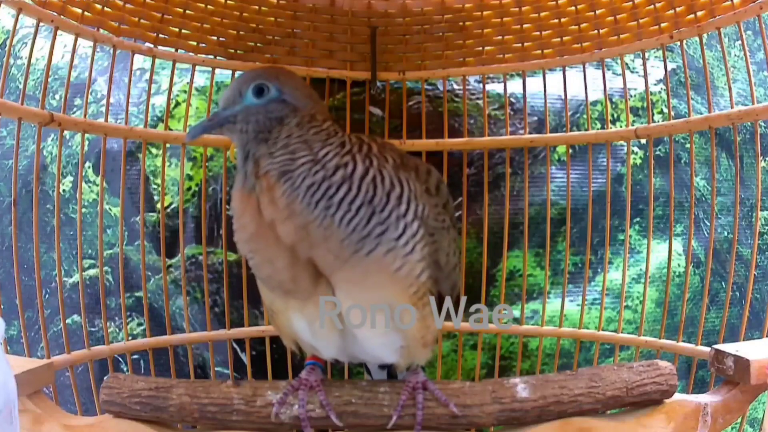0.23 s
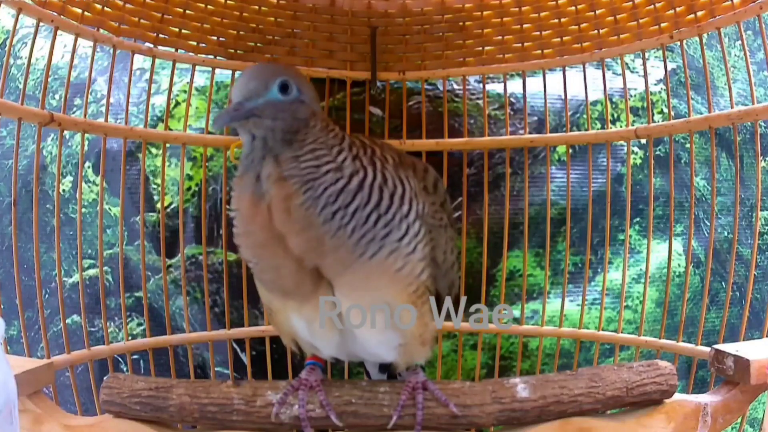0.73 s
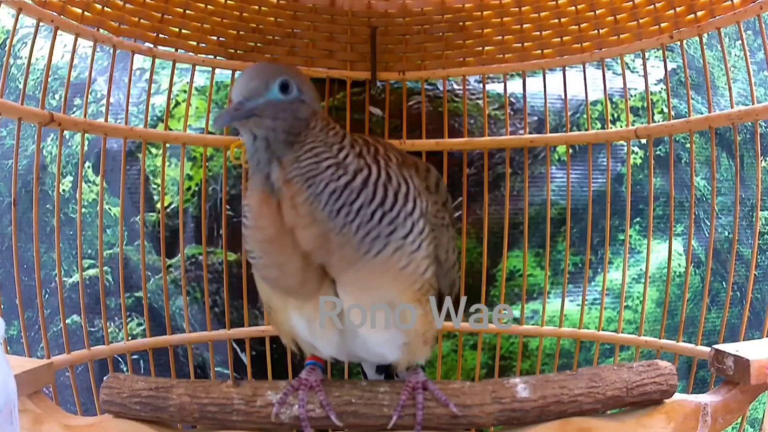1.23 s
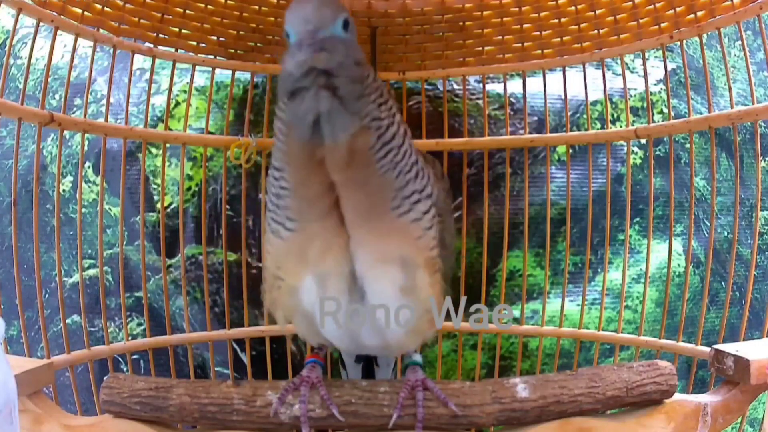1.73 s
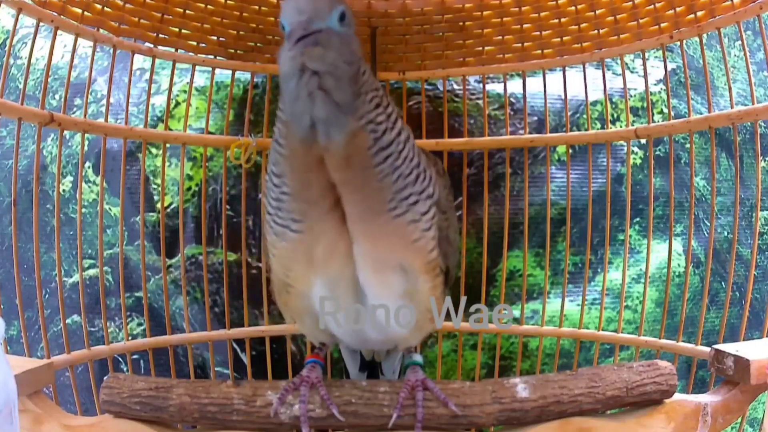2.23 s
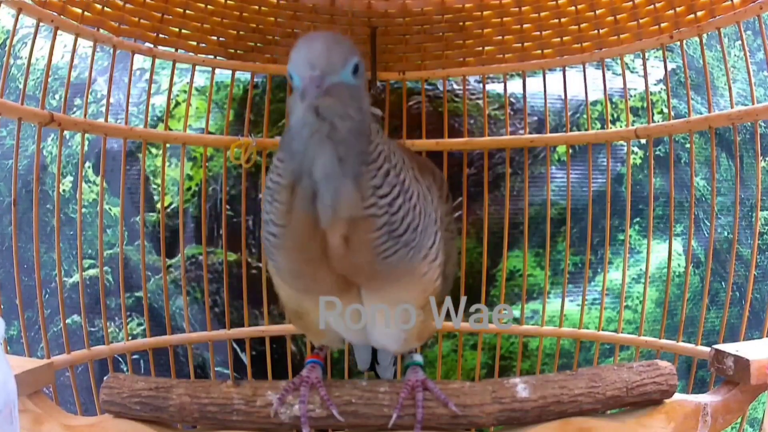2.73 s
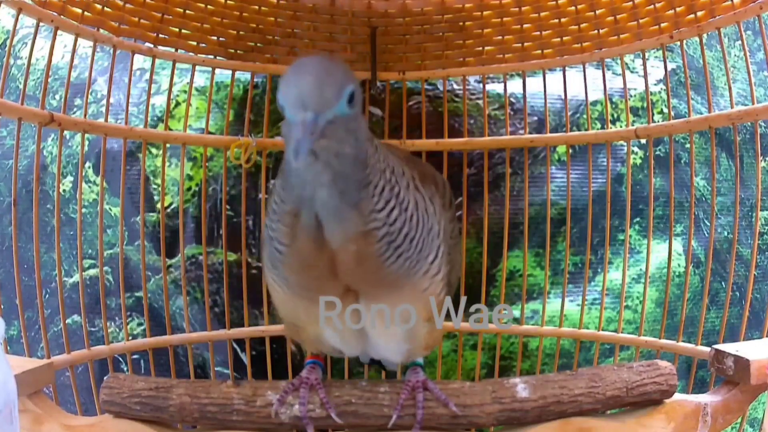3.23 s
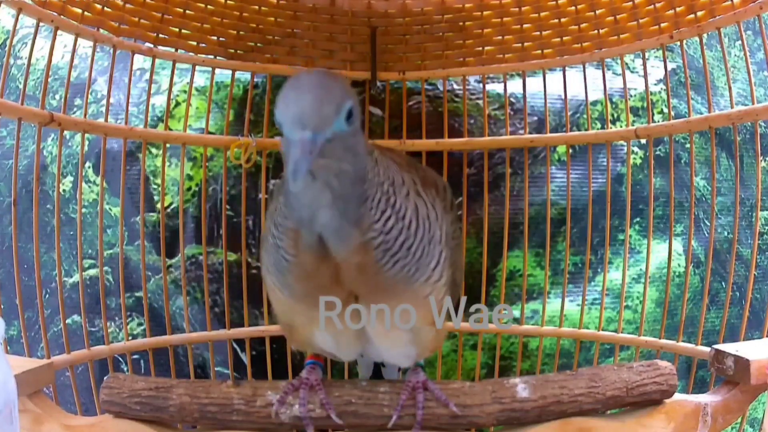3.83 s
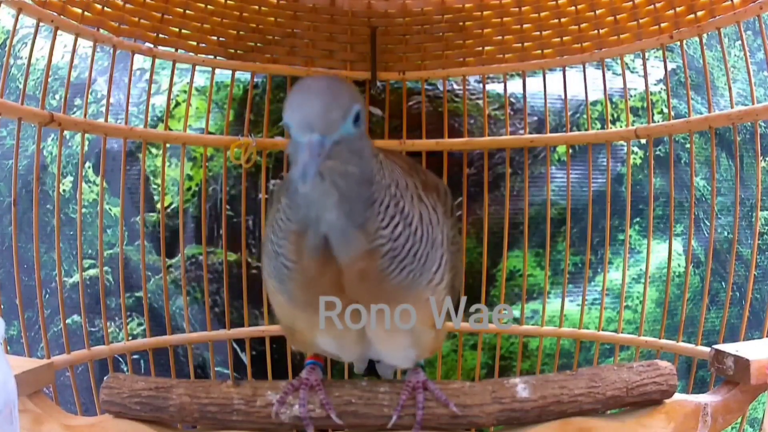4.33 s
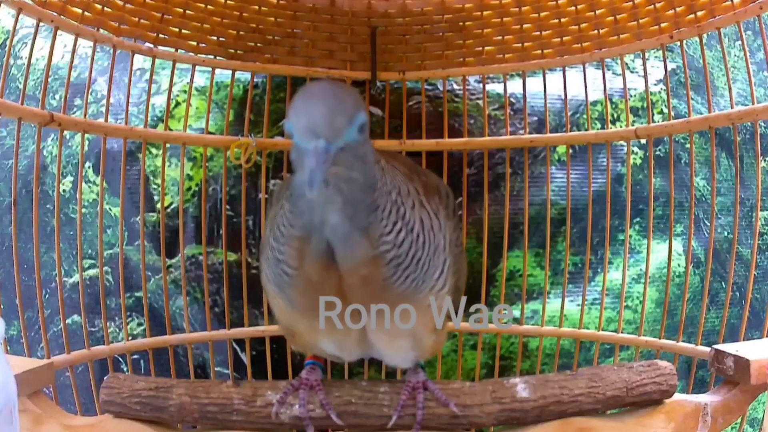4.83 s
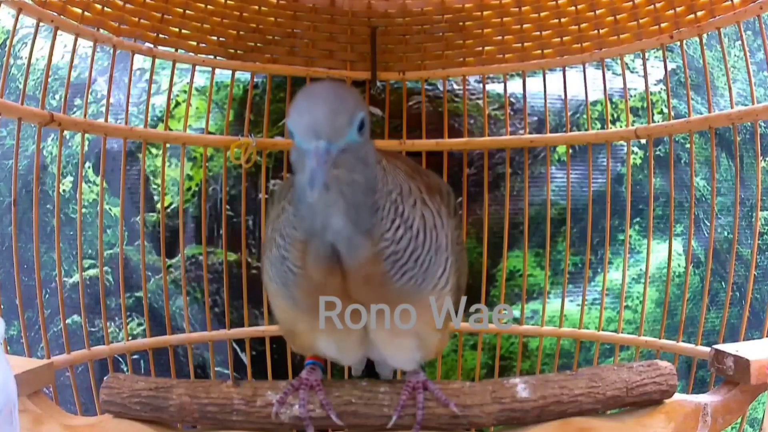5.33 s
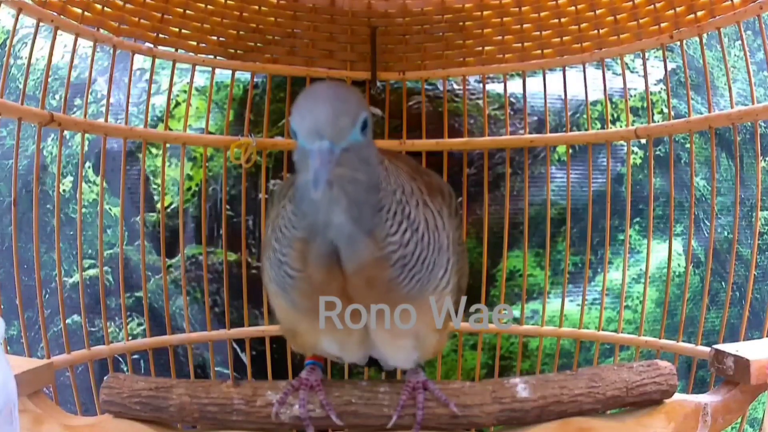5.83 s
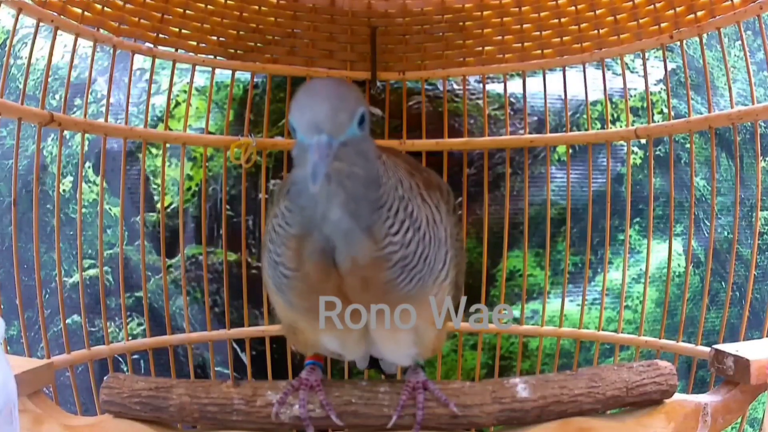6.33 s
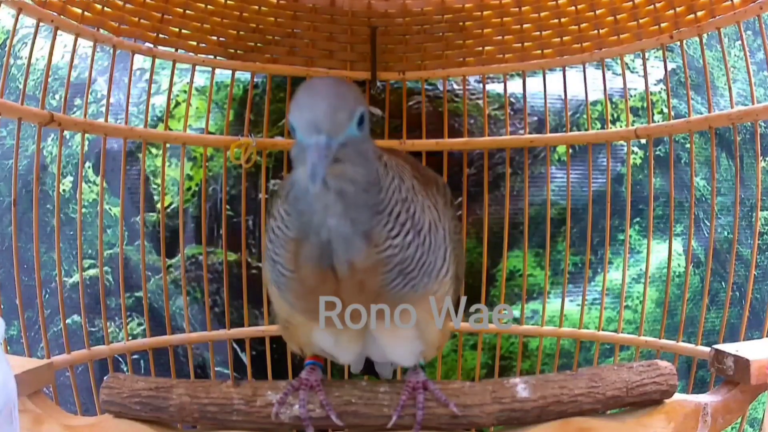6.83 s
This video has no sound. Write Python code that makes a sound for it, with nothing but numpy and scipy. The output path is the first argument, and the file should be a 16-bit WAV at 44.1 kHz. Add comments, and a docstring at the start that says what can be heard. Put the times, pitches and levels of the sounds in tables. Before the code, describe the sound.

A quiet porch: soft low rumble, faint hum, thin throbbing insects and grainy rustle, wider on the right. At 0.7 s a dove off to the right gives a short note gliding upward and breaking off, its tone nearly pure and flute-like, with echoes ringing from hard walls. From 1.2 s it repeats short, round coos about four a second, each scooping up, gradually longer and more widely spaced until 4.6 s. A rustle swells around 1.6 s as the rumble briefly dips. At 2.6 s a closer, centred, drier dove enters with a jumping opening note, then from 3.0 to 6.0 s its own lower, softer coos, interleaved with the first bird. The right-hand dove closes with a long, slightly sinking coo from 4.9 to 5.7 s; the near one closes likewise from 6.2 to 6.8 s. A rustle peaks near 6.5 s, then quiet air until about 7 s.

```python
"""First come a low rumble, a hum, a band of insects and swells of rustle around a quiet porch.
Then a caged dove further off to the right sings and rings in the walls; a close, centred one answers lower.
Each gives a gliding opening note, a run of short coos and a long closing coo. The doves are gliding
sine tones with weak overtones and breath; the walls are fading echoes; the hum is a wavering sine.
Rumble, air, insects and rustle are noise shaped to different pitch ranges."""
import sys
import numpy as np
from scipy import signal
from scipy.fft import rfft, irfft, next_fast_len
from scipy.io import wavfile
from scipy.ndimage import uniform_filter1d

SR = 44100
rng = np.random.default_rng(int(sys.argv[2]) if len(sys.argv) > 2 else 0)


def dump_mix(stems):
    """Bounce the given channels to the path in sys.argv[1] as a 16-bit WAV at rate SR."""
    frames = np.atleast_2d(stems).T  # one column per channel
    limited = np.clip(frames, -1, 1)  # hard clip at full scale
    pcm = np.round(limited * 32767).astype(np.int16)
    wavfile.write(sys.argv[1], SR, pcm)


N = 312669  # length in samples

# Opening note and long closing coo, each a list of points: time_s, pitch_hz, level_db
FAR_LONG_NOTES = [
    [(.735, 457.6, -56), (.77, 697, -30.5), (.782, 844, -17), (.83, 912.6, -16.5), (.872, 933.6, -16.5),
     (.888, 1051, -19.5), (.908, 1095, -18), (.919, 830, -22), (.93, 760, -38)],
    [(4.885, 557, -52.5), (4.897, 787.5, -29), (4.906, 844, -14.5), (4.99, 887.7, -18.5),
     (5.36, 882.7, -17.5), (5.5, 857.4, -18), (5.655, 840, -24), (5.675, 798, -33.5), (5.685, 755, -54)],
]
NEAR_LONG_NOTES = [
    [(2.622, 477, -44.5), (2.634, 652, -33), (2.655, 711, -18), (2.705, 796.8, -15), (2.711, 1054, -14),
     (2.795, 1064, -11.5), (2.816, 1045, -12.5), (2.826, 992.3, -16), (2.853, 1021, -12.5),
     (2.864, 760, -21.5), (2.874, 514, -46.5)],
    [(6.238, 660, -49), (6.248, 632, -28), (6.27, 716.5, -16.5), (6.304, 735, -19), (6.53, 720.5, -18.5),
     (6.68, 706.2, -23), (6.818, 703.5, -22), (6.832, 654, -27), (6.845, 643, -47)],
]
# Short coos: start_s, end_s, final_pitch_hz (before the closing drop), level_db (at the start)
FAR_SHORT_COOS = [(1.224, 1.29, 904, -12), (1.476, 1.554, 906.3, -12.5), (1.735, 1.823, 926, -11.5),
                  (2.011, 2.108, 922.6, -13), (2.282, 2.386, 916.2, -12), (2.574, 2.699, 921.6, -12.5),
                  (2.888, 3.01, 909.5, -13), (3.207, 3.367, 918.2, -14), (3.603, 3.784, 906, -13.5),
                  (4.018, 4.201, 908.6, -14), (4.418, 4.644, 902.5, -14.5)]
NEAR_SHORT_COOS = [(3.045, 3.133, 800, -17.5), (3.271, 3.367, 800, -16.5), (3.503, 3.615, 782, -17),
                   (3.754, 3.872, 775, -16.5), (4.013, 4.143, 772, -17), (4.292, 4.434, 774, -17),
                   (4.581, 4.73, 764, -17), (4.877, 5.036, 762, -17.5), (5.182, 5.345, 755, -17.5),
                   (5.505, 5.677, 745, -18.5), (5.85, 6.032, 748, -19)]
# Where every short coo aims first and how it swells or fades to its end: first_pitch_hz, swell_db
FAR_FIRST_AIM = (892, -3)
NEAR_FIRST_AIM = (746, 3)
# How a short coo starts and stops: quick_scoop_share, quick_scoop_s, slow_scoop_share, slow_scoop_s,
# pitch_drop_share, pitch_drop_s, attack_s, release_s
FAR_COO_SHAPE = (.38, .0055, .085, 0.03, 0.1, 0.005, 0.0074, 0.0097)
NEAR_COO_SHAPE = (.17, .006, .165, 0.022, .27, 0.0096, 0.0074, 0.0058)
# How the closed throat passes overtones, loud near the windpipe resonance:
# pitch_hz, level_db (against the fundamental)
FAR_THROAT_CURVE = [(900, -12.5), (1330, -3.5), (1550, -31.5), (1800, -36.5), (2150, -19.5), (2500, -32.5),
                    (2750, -31), (3150, -17), (3450, -40), (3750, -18.5), (4050, -37.5), (4450, -34.5),
                    (5400, -46), (7000, -64)]
NEAR_THROAT_CURVE = [(1000, -19), (1320, -15), (1410, -35.5), (1465, -23.5), (1560, -22), (2000, -34),
                     (2250, -33.5), (2900, -45.5), (3200, -41), (3700, -57.5), (4250, -47.5), (5300, -50),
                     (6300, -48), (8000, -71)]
# Third to seventh overtone: levels_db (list, against the throat curve),
# gain_db_per_db (of effort), normal_effort_db
FAR_UPPER_OVERTONES = ([-5, -18.5, -8, -17, -18], 1.1, -12)
NEAR_UPPER_OVERTONES = ([-6, -9.5, -8.5, -10, -10.5], 0.84, -14)
# How unevenly the overtones come and go: second_db, higher_db
FAR_PATCHINESS = (4, 6)
NEAR_PATCHINESS = (1.2, 1.5)
# Hoarse puffs where a long note catches or breaks off: start_s, length_s, level_db
FAR_HOARSE_PUFFS = [(0.735, 0.047, -29.5), (0.912, 0.019, -35), (4.883, 0.018, -26)]
NEAR_HOARSE_PUFFS = [(2.62, 0.028, -33), (2.699, 0.014, -30), (2.854, 0.02, -31)]
# The far bird also catches before every short coo: lead_s, length_s, level_db
FAR_COO_CATCH = (0.0074, .016, -31)
# Tone colour of the hoarse puffs and of the breath: pitch_hz, relative_level_db (per Hz)
PUFF_COLOUR = [(300, -32), (550, -3.5), (900, -2.5), (1150, -6.5), (1340, 1), (1500, -18.5), (2000, -34.5),
               (4000, -53.5)]
BREATH_COLOUR = [(150, -13.5), (500, -1), (1000, 0), (1500, -8), (2200, -19.5), (3500, -31), (9000, -45)]
# Dense wall echoes: low_db, high_db, first_echo_s, low_fade_s, high_fade_s (time to fade by 60 dB)
FAR_WALL_ECHOES = (-5.5, 0, 0.12, 1.09, 0.66)
NEAR_WALL_ECHOES = (-15.5, -22, .012, .45, .3)
# Late answers from hard walls behind the far cage: delay_s, level_db
HARD_WALL_ECHOES = [(.0462, -12), (.0613, -13.5), (.0834, -14), (.112, -16.5)]
# Tone colour of the steady rumble and of the outdoor air: pitch_hz, relative_level_db (per Hz)
RUMBLE_COLOUR = [(15, -33.5), (30, -16), (55, -9), (70, -0.5), (90, -4.5), (150, -6), (230, -17.5),
                 (450, -14.5), (1000, -25.5), (2000, -36.5), (5000, -44.5), (11000, -43), (12500, -38.5),
                 (15500, -39.5)]
AIR_COLOUR = [(20, -15.5), (70, -2), (150, -10), (400, -19.5), (900, -16.5), (1500, -27), (3000, -32),
              (6500, -38.5), (10500, -40.5), (12000, -52.5)]
# Level changes of the centred noise, with a brief dip: time_s, bass_db, top_hiss_db
CENTRE_LEVELS = [(0, 0, 1), (1.55, 0, 0), (1.6, -6, -14), (1.7, -7, -12), (1.8, 1, -6), (2.2, 0, -4),
                 (2.3, 0, 0), (7.1, -2, -1)]
# The hum: time_s, pitch_hz, level_db
HUM_PATH = [(0, 176.2, -67), (.3, 172.6, -58), (1.0, 171.8, -58), (1.5, 171, -59.5), (1.65, 172, -87),
            (6.55, 205.5, -83), (6.7, 205.6, -57.5), (7.1, 201.4, -59)]
# The insect band: pitch_hz, width_hz, level_db
INSECT_BAND = (7300, 670, -71)
# Swells of the rustle: time_s, level_db
RUSTLE_SWELLS = [(0.0, -81), (0.43, -65), (0.63, -68), (0.75, -61), (1.22, -76.5), (1.6, -57), (1.78, -66),
                 (2.27, -77.5), (2.33, -63), (2.43, -73.5), (2.76, -65), (2.88, -77), (3.37, -69),
                 (4.84, -70.5), (5.03, -65.5), (5.37, -60), (5.5, -64.5), (5.79, -62), (5.86, -70),
                 (6.3, -69.5), (6.48, -55), (6.62, -65.5), (6.9, -78.5), (7.09, -72)]
# Bands of rustle that flicker apart: pitch_hz, width_hz, level_db (added to the swells)
RUSTLE_PARTS = [(3780, 310, -4), (4600, 540, -3), (5680, 1200, -5.5), (7000, 2100, -4.5), (8400, 670, -8.5),
                (10200, 2200, -2.5)]

FAR_BREATH_DB, NEAR_BREATH_DB = -31.5, -26
FAR_LEFT_DB, RIGHT_TO_LEFT_S = -8.5, 0.0003
ECHO_LEFT_DB, HARD_ECHO_LEFT_DB = -5.5, -8
SWAY_S = .00012  # how far the path to the walls wanders as bird and air move
RUMBLE_DB, AIR_DB = -52, -48.5
YARD_LEFT_DB, YARD_LIKENESS = -6.5, 0.3  # likeness: share of sound common to both sides
OFFSET = -.0047
TOP_HZ = 15600


def phrase(notes, coos, aim, shape):
    """Pitch and size of a whole song; a short coo scoops up, moves slowly and drops as it shuts."""
    hz, size, t = np.full(N, 600.), np.zeros(N), np.arange(N) / SR
    for note in notes:
        on = slice(int(note[0][0] * SR), int(note[-1][0] * SR))
        pitch, db = curve(note)
        hz[on], size[on] = pitch[on], undb(db[on])
    first_hz, swell_db = aim
    quick, quick_s, slow, slow_s, drop, drop_s, attack_s, release_s = shape
    for start, end, final_hz, db in coos:
        on = slice(int(start * SR), int(end * SR))
        since = t[on] - start
        left = np.maximum(end - t[on], 0)
        part = since / (end - start)  # 0 at the start, 1 at the end
        scoop = quick * np.exp(-since / quick_s) + slow * np.exp(-since / slow_s)
        bend = 1 - scoop - drop * np.exp(-left / drop_s)
        hz[on] = (first_hz + part * (final_hz - first_hz)) * bend
        attack = (1 - np.exp(-np.abs(since) / attack_s)) ** 3
        release = (1 - np.exp(-left / release_s)) ** 2
        size[on] = undb(db + part * swell_db) * attack * release
    # a short running average rounds the corners
    return uniform_filter1d(hz, size=90), uniform_filter1d(size, size=90)


def dove(hz, size, throat, upper, patchiness, puffs, breath_db):
    """A near-pure tone with weak, patchy overtones that grow with effort, a little air and hoarse puffs."""
    hz = hz * (1 + .0025 * walk(60))  # slight waver in pitch
    phase = 2 * np.pi * np.cumsum(hz) / SR
    levels_db, gain, normal_db = upper
    second_db, higher_db = patchiness
    effort_db = gain * (20 * np.log10(size + 1e-6) - normal_db)
    second = undb(colour(throat, 2 * hz) + second_db * walk(50))
    tone = np.sin(phase) + second * np.sin(2 * phase + 1)
    for k, level_db in enumerate(levels_db, start=3):
        overtone_db = colour(throat, k * hz) + level_db + effort_db + higher_db * walk(80)
        tone = tone + undb(overtone_db) * np.sin(k * phase + k)
    shimmer = undb(1.14 * walk(45))  # slight flicker in level
    breath = undb(breath_db) * noise(BREATH_COLOUR)
    voice = np.sqrt(2) * shimmer * tone + breath
    return size * voice + hoarse_puffs(puffs)


def hoarse_puffs(puffs):
    """Short bumps of rough noise in the voice."""
    loudness = np.zeros(N)
    for start, length, db in puffs:
        bump = undb(db) * np.hanning(int(length * SR)) ** .5
        first = int(start * SR)
        loudness[first:first + len(bump)] = bump
    return loudness * noise(PUFF_COLOUR)


def walls(x, room, count):
    """Dense echoes that die away, the treble sooner; one unrelated pattern per channel."""
    low_db, high_db, first_s, low_s, high_s = room
    t = np.arange(SR) / SR
    dense = rng.standard_normal((count, SR))
    low = signal.sosfiltfilt(signal.butter(3, 1200, fs=SR, output="sos"), dense)
    low_fade, high_fade = undb(-60 * t / low_s), undb(-60 * t / high_s)
    low_fade = low_fade / np.sqrt(np.sum(low_fade ** 2))
    high_fade = high_fade / np.sqrt(np.sum(high_fade ** 2))
    tail = undb(low_db) * low * low_fade + undb(high_db) * (dense - low) * high_fade
    tail = tail * np.clip(t / first_s - 1, 0, 1)  # silent until the first echo, then builds up
    swayed = np.interp(np.arange(N) + SWAY_S * SR * walk(25), np.arange(N), x)
    return signal.fftconvolve(swayed[None], tail, axes=1)[:, :N]


def hard_walls(x):
    """A few separate late echoes, each a delayed and softer copy, softest on the left."""
    slaps = sum(undb(db) * np.roll(x, int(delay_s * SR)) for delay_s, db in HARD_WALL_ECHOES)
    return slaps * undb([[HARD_ECHO_LEFT_DB], [0]])


def from_right(x, left_db):
    """A sound from the right reaches the left side later and softer."""
    late = np.interp(np.arange(N) - RIGHT_TO_LEFT_S * SR, np.arange(N), x)
    return np.array([undb(left_db) * late, x])


def centred_background():
    """Noise split into a swelling rumble and a thin top hiss, plus a sine hum that wavers."""
    bass_db, top_db = curve(CENTRE_LEVELS)
    rumble = noise(RUMBLE_COLOUR) * undb(RUMBLE_DB)
    top = signal.sosfiltfilt(signal.butter(6, 11500, "high", fs=SR, output="sos"), rumble)
    swell_db = 1.5 * walk(6)
    hz, db = curve(HUM_PATH)
    hum_phase = 2 * np.pi * np.cumsum(hz * (1 + 0.012 * walk(13))) / SR
    hum = undb(db + 4.3 * walk(4.4)) * np.sin(hum_phase)
    return (rumble - top) * undb(bass_db + swell_db) + top * undb(top_db) + np.sqrt(2) * hum


def yard():
    """Noise bands for wide air, throbbing insects and grainy rustle, all louder on the right."""
    hz, width, db = INSECT_BAND
    layers = [(undb(AIR_DB), AIR_COLOUR), (undb(db + 2.1 * walk(14)), band(hz, width))]
    swell_db = curve(RUSTLE_SWELLS)[0] + 2.5 * walk(30)  # shared by all rustle bands
    for hz, width, db in RUSTLE_PARTS:
        layers.append((undb(swell_db + db + 3.2 * walk(45)), band(hz, width)))
    a, b = (sum(gain * noise(points) for gain, points in layers) for _ in range(2))
    # both sides share the long bass waves; higher up the left hears partly its own air
    bass = signal.sosfilt(signal.butter(1, 300, fs=SR, output="sos"), [a, b])
    own = (1 - YARD_LIKENESS) * bass[0] + np.sqrt(1 - YARD_LIKENESS ** 2) * (b - bass[1])
    left, right = from_right(a, YARD_LEFT_DB)
    return np.array([YARD_LIKENESS * left + undb(YARD_LEFT_DB) * own, right])


def band(hz, width):
    """Tone colour of one noise band: loudest in the middle, falling away on both sides."""
    return [(hz - 1.5 * width, -40), (hz - width / 2, -3), (hz, 0),
            (hz + width / 2, -3), (hz + 1.5 * width, -40)]


def noise(points):
    """Random hiss shaped to a tone colour, at an average (rms) level of 1."""
    size = next_fast_len(N)
    spectrum = rfft(rng.standard_normal(size))
    gain = undb(colour(points, np.fft.rfftfreq(size, 1 / SR)))
    x = irfft(spectrum * gain, size)[:N]
    return x / np.std(x)


def colour(points, hz):
    """Level in dB of a tone colour at the given frequencies."""
    table_hz, table_db = np.array(points)[:, 0], np.array(points)[:, 1]
    return np.interp(np.log(hz + 1), np.log(table_hz), table_db)


def walk(rate):
    """Slow random wandering with a spread near 1: levels held 1 / rate seconds, smoothed twice."""
    k = int(SR / rate)
    steps = np.repeat(rng.standard_normal(N // k + 1), k)
    return 1.3 * uniform_filter1d(uniform_filter1d(steps, k), k)[:N]


def curve(rows):
    """Values of a table that starts with time_s, joined by straight lines at every sample."""
    s, *columns = np.transpose(rows)
    return [np.interp(np.arange(N) / SR, s, c) for c in columns]


def undb(db):
    """Turn decibels into a plain loudness factor."""
    return 10 ** (np.asarray(db) / 20)


def scene():
    """Both doves with their echoes, over the centred background and the yard."""
    lead_s, length_s, catch_db = FAR_COO_CATCH
    catches = [(coo[0] - lead_s, length_s, catch_db) for coo in FAR_SHORT_COOS]
    far_hz, far_size = phrase(FAR_LONG_NOTES, FAR_SHORT_COOS, FAR_FIRST_AIM, FAR_COO_SHAPE)
    far = dove(far_hz, far_size, FAR_THROAT_CURVE, FAR_UPPER_OVERTONES, FAR_PATCHINESS,
               FAR_HOARSE_PUFFS + catches, FAR_BREATH_DB)
    near_hz, near_size = phrase(NEAR_LONG_NOTES, NEAR_SHORT_COOS, NEAR_FIRST_AIM, NEAR_COO_SHAPE)
    near = dove(near_hz, near_size, NEAR_THROAT_CURVE, NEAR_UPPER_OVERTONES, NEAR_PATCHINESS,
                NEAR_HOARSE_PUFFS, NEAR_BREATH_DB)
    far_echoes = walls(far, FAR_WALL_ECHOES, count=2) * undb([[ECHO_LEFT_DB], [0]]) + hard_walls(far)
    near_echoes = walls(near, NEAR_WALL_ECHOES, count=1)
    doves = from_right(far, FAR_LEFT_DB) + far_echoes + near + near_echoes
    return doves + centred_background() + yard()


def record(dry):
    """Add a small steady offset and cut the top of the treble steeply."""
    return signal.sosfilt(signal.ellip(10, .2, 80, TOP_HZ, fs=SR, output="sos"), dry + OFFSET)


dry = scene()
out = record(dry)
dump_mix(out)
```